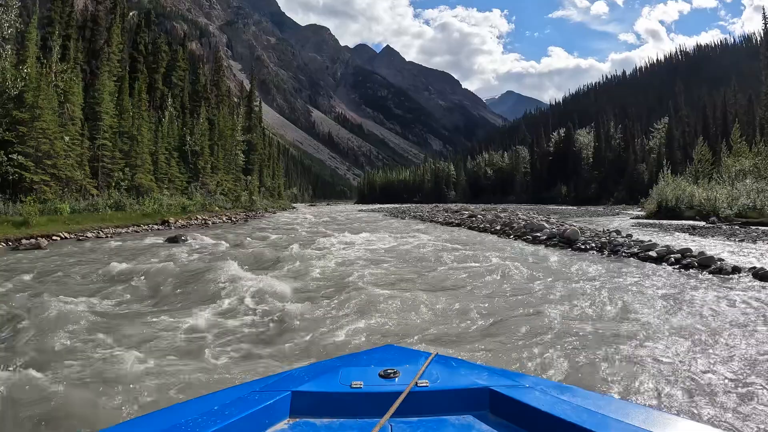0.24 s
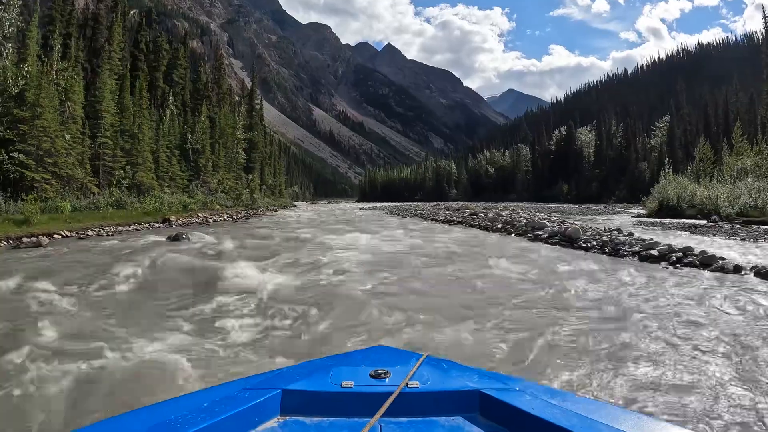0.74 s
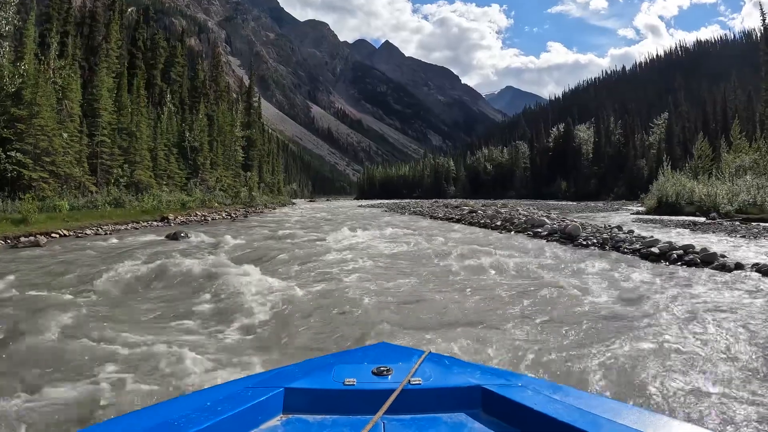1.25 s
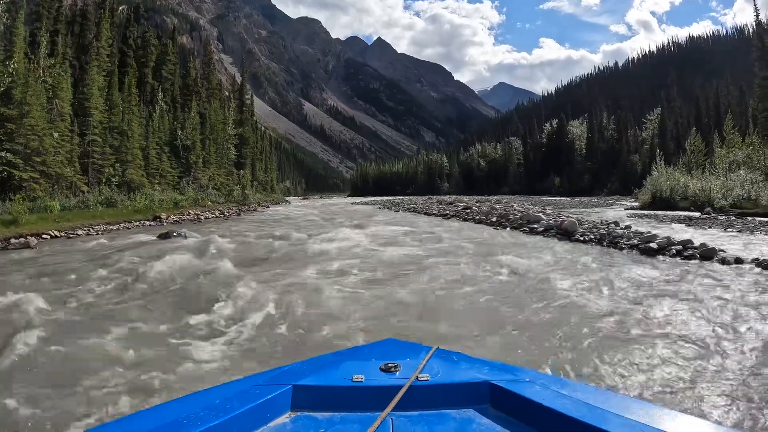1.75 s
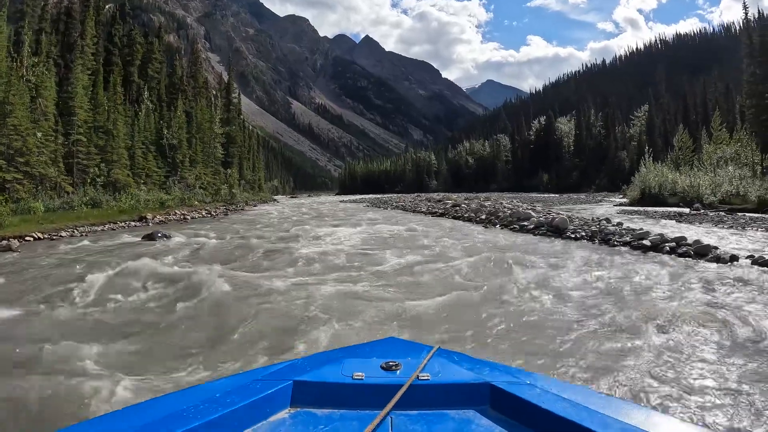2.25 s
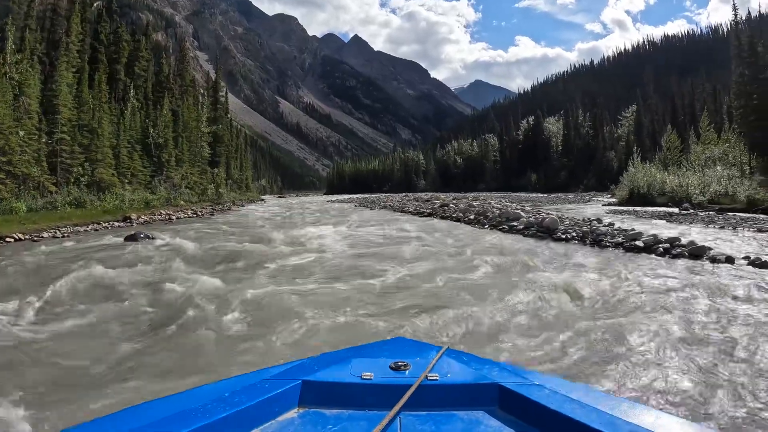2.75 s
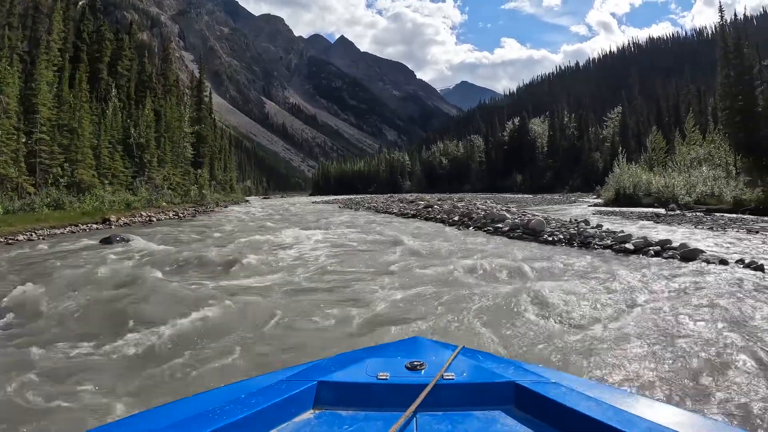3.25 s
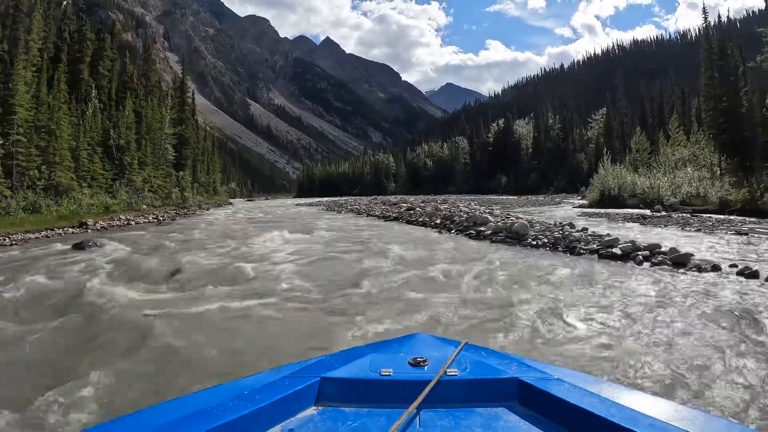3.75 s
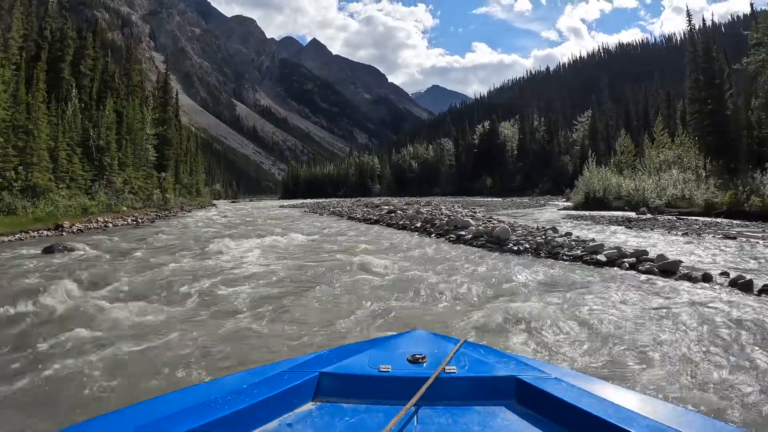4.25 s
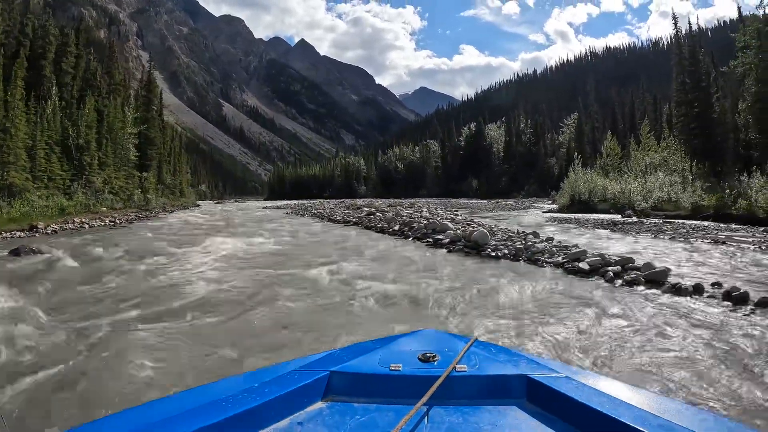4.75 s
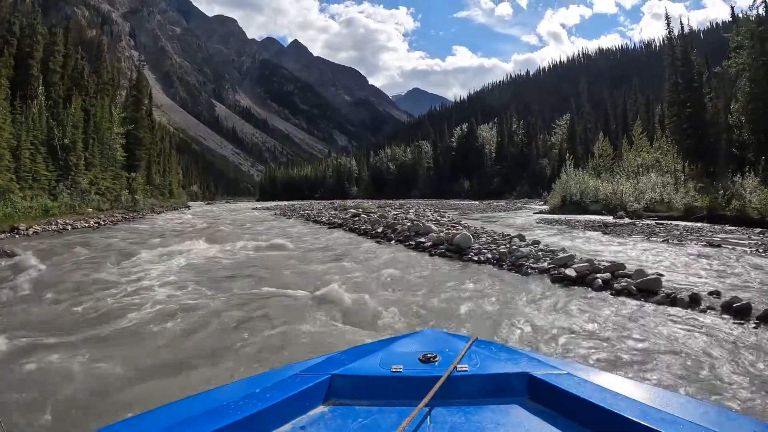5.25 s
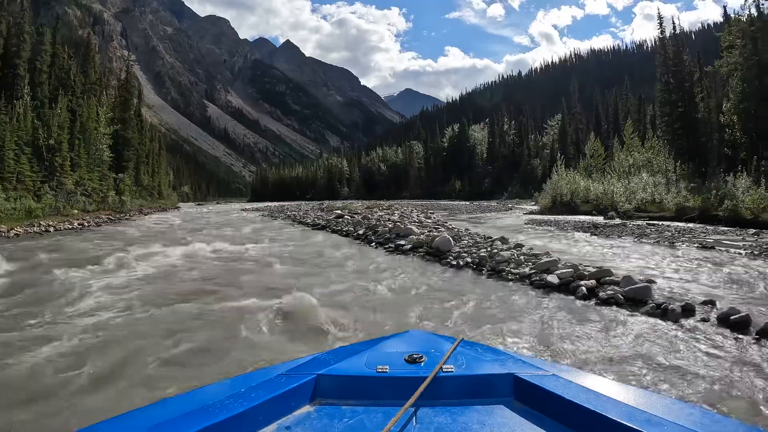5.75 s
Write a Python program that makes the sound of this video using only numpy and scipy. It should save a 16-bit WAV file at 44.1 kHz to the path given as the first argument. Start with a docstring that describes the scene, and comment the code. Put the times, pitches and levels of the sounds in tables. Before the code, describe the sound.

A boat's V8 revs up quickly, then holds a deep, unsteady drone that turns throbbing and burbly while river water rushes along the hull.

```python
"""A jet boat's V8 picks up speed and settles into a steady drone, heard from on board on a fast river.
The engine is a stack of unsteady tones at multiples of its cycle rate, and it buzzes the hull plates.
The exhaust at the waterline booms while clear; covered by the wake, it throbs and burbles with bubbles.
Water rumbles and slaps under the hull as shaped noise, and froth and fine drops fill its wash and spray.
A limiter holds the peaks."""
import sys
import numpy as np
from scipy import signal
from scipy.fft import rfft, irfft, next_fast_len
from scipy.io import wavfile
from scipy.ndimage import uniform_filter1d, minimum_filter1d, map_coordinates

SR = 44100
rng = np.random.default_rng(int(sys.argv[2]) if len(sys.argv) > 2 else 0)


def output_pcm(signal):
    """Save a mono or channel-first signal as 16-bit PCM at the path in sys.argv[1].

    Samples are clipped to [-1, 1] before scaling.
    """
    pcm = np.clip(np.atleast_2d(signal).T, -1, 1) * 32767
    wavfile.write(sys.argv[1], SR, np.round(pcm).astype(np.int16))


N = 264159
TOP_HZ = 15700  # band limit, also the highest starting pitch of a bubble
LOAD_DB_PER_DECADE = 60  # growl and plate buzz against engine speed

# Engine speed. Each row: time in seconds, four-stroke cycles per second.
ENGINE_SPEED = [(0, 15.67), (0.42, 17.92), (0.68, 18.15), (0.86, 18.02), (1.42, 19.32), (1.75, 19.63),
                (2.1, 19.67), (2.7, 19.92), (2.95, 20.14), (3.5, 20.34), (3.75, 20.17), (4.22, 20.25),
                (4.55, 19.92), (5.1, 19.66), (5.99, 19.54)]
# How far the wake covers the exhaust outlet. Each row: time in seconds, cover from 0 clear to 1 covered.
OUTLET_COVER = [(0, 0.088), (.6, .02), (1.2, 0.085), (1.5, 0.12), (1.62, 0.85), (1.82, 0.87), (1.96, .45),
                (2.25, 0.6), (2.65, .95), (3.45, 0.67), (3.95, 0.78), (4.55, .92), (4.98, 1), (5.2, 0.54),
                (5.98, 0.24)]

# Exhaust and engine levels that follow the cover, before any momentary change.
# Each is a pair: level with the outlet clear in dB, level with it covered in dB.
CRANK_DB = (-43.5, -20.5)  # crankshaft throb, two a cycle
LOPE_DB = (-31.5, -44.5)  # slow lope, three beats a cycle
TWICE_CRANK_DB = (-33.5, -24)  # four a cycle
FIRING_DB = (-15.5, -33.5)  # firing tone, eight a cycle
GROWL_GAIN_DB = (-2.5, .5)  # gain on all the weaker tones
RUMBLE_DB = (-34, -30)
BURBLE_DB = (-33.5, -26.5)

# Uneven beat of one cylinder bank, five a cycle, before swells. Each row: time in seconds, level in dB.
BANK_BEAT = [(0, -24.5), (.48, -13.5), (.8, -16.5), (1.2, -16), (2.0, -19), (3.15, -14.5), (4.25, -19),
             (5.2, -16.5), (5.98, -22)]
# Drone an octave above the firing tone, before swells. Each row: time in seconds, level in dB.
DRONE_LEVEL = [(0, -29.5), (.35, -29.5), (1.1, -34), (1.8, -29.8), (2.2, -31.5), (3.0, -29), (3.9, -32),
               (4.45, -27.5), (5.98, -27.5)]
# Weaker tones from unequal cylinders. Each row: multiple of the cycle rate, level in dB before load and cover.
GROWL_TONES = [(1, -43), (6, -40.5), (7, -30.5), (9, -40), (10, -37.5), (11, -41.5), (12, -43), (13, -44),
               (15, -42.5), (17, -41.5), (18, -47), (19, -47), (21, -52.5), (23, -50.5), (24, -49),
               (27, -56.5), (29, -52.5), (32, -53), (40, -56.5)]
# Engine tones that swell or fade for a moment.
# Each row: multiple of the cycle rate, middle in seconds, half length in seconds, change in dB.
TONE_SWELLS = [(3, 5.1, 0.35, 13.5), (5, 1.438, .1, -20), (5, 2.5, .22, -6), (5, 4.58, 0.078, -21.5),
               (5, 5.0, .07, -6), (8, 1.78, .09, -10), (8, 3.9, 0.045, 2.5), (16, 1.42, .06, -5),
               (16, 5.22, 0.084, -12.5), (19, 2.85, 0.24, 10), (21, .7, 0.45, 10.5), (21, 4.3, .3, 9.5)]
# Hull plate resonances. Each row: centre in Hz, width in Hz, relative gain in dB.
HULL_RESONANCES = [(273.6, 24, 2.5), (378.2, 23, -2.5), (635, 70, -15.5)]

# Waves that rumble under the hull. Each row: middle in seconds, half length in seconds, level in dB.
HULL_WAVES = [(.02, .1, -21), (1.618, .13, -24), (2.566, .08, -28), (3.677, 0.11, -22.5), (4.202, .08, -26),
              (5.6, 0.19, -23)]
# Exhaust gas gulping out of the wake. Each row: middle in seconds, half length in seconds, level in dB.
GAS_GULPS = [(1.7, 0.28, -22.5), (2.268, .11, -21), (4.15, .12, -25), (4.68, 0.14, -22.5), (5.17, .12, -26)]
# Water along the hull, before its flutter. Each row: time in seconds, wash level in dB, spray level in dB.
WATER_FLOW = [(0, -33.5, -50.5), (.3, -33.5, -51), (.62, -38.5, -55.5), (1.3, -37.5, -55),
              (2.2, -34.5, -54), (2.8, -31.5, -52), (3.7, -34.5, -54), (4.3, -32, -51), (4.8, -31.5, -51.5),
              (5.45, -33, -51), (5.99, -33.5, -52.5)]
# Slaps of water on the hull.
# Each row: start in seconds, level in dB before the envelope, pitch in Hz, length in seconds.
HULL_SLAPS = [(0.207, -31, 682, 0.03), (1.916, -33, 640, .16), (3.847, -31, 860, .02),
              (5.483, -45, 4250, .02)]

# Tone colours, as filter curves. Each row: frequency in Hz, relative gain in dB.
RUMBLE_COLOUR = [(5, -15), (14, -8.5), (32, -7), (50, 4.5), (72, 0.5), (105, -4.5), (150, -24), (300, -60),
                 (600, -120)]
BURBLE_COLOUR = [(40, -40.5), (80, -8), (120, -4), (165, -1), (205, -2), (240, -10.5), (330, -19),
                 (600, -44), (1500, -120)]
WASH_COLOUR = [(60, -29.5), (200, 3.5), (420, 2), (520, -1), (690, -1.5), (990, -5.5), (1500, -10.5),
               (2000, -17.5), (3000, -27.5), (6000, -56.5), (12000, -120)]
SPRAY_COLOUR = [(500, -51), (1400, -5.5), (2200, 0), (3100, -2.5), (4000, -6.5), (5000, -10.5),
                (6000, -14.5), (6900, -16.5), (8000, -18), (10000, -27), (11200, -30), (12300, -16.5),
                (13400, -31), (15500, -33)]


def amp(db):
    """Decibels to gain."""
    return 10 ** (np.asarray(db) / 20)


def unit(x):
    """Scale x to rms 1."""
    return x / np.sqrt(np.mean(x ** 2) + 1e-20)


def curves(rows):
    """Draw one automation curve, a value per sample, for each column after the time."""
    seconds, *columns = np.transpose(rows)
    return [np.interp(np.arange(N) / SR, seconds, column) for column in columns]


def blend(levels_db, cover):
    """Crossfade the gain from the clear to the covered level of the exhaust."""
    clear, covered = amp(levels_db)
    return clear + (covered - clear) * cover


def swell(middle, half_length):
    """A bell-shaped rise and fall around a moment, in seconds."""
    return np.exp(-((np.arange(N) / SR - middle) / half_length) ** 2)


def wobble(rate):
    """A smooth random curve with rate knots a second."""
    knots = rng.standard_normal(int(N * rate / SR) + 4)
    return map_coordinates(knots, [np.arange(N) * rate / SR])


def filtered(x, response):
    """Filter x by a complex response of frequency in Hz."""
    size = next_fast_len(N + SR // 2)
    hz = np.fft.rfftfreq(size, 1 / SR)
    return irfft(rfft(x, size) * response(hz), size)[:N]


def coloured(x, colour):
    """Shape x by a filter curve drawn on a log frequency axis, then scale to rms 1."""
    f, db = np.transpose(colour)
    return unit(filtered(x, lambda hz: amp(np.interp(np.log(hz + 1), np.log(f), db))))


def turbulence(patchy_db):
    """White noise with smooth patches of random gain in time and frequency."""
    grid = signal.stft(rng.standard_normal(N), nperseg=512)[2]
    patches = uniform_filter1d(rng.standard_normal(grid.shape), size=6, axis=0)  # across frequency
    patches = uniform_filter1d(patches, size=12, axis=1)  # across time
    return unit(signal.istft(grid * amp(patchy_db * unit(patches)), nperseg=512)[1][:N])


def bubbles(count, centre_hz, spread, cycles, size_db, rise):
    """Scattered damped rings of random pitch and size, each rising in pitch as it dies."""
    start, size = rng.random((count, 2)).T
    hz = centre_hz * np.exp(spread * rng.standard_normal((count, 1)))
    hz = np.clip(hz, centre_hz / 2, TOP_HZ)
    t = np.arange(int(2 * cycles * SR / centre_hz)) / SR
    age = hz * t / cycles  # 1 when the ring has died by 40 dB
    envelope = np.exp(-np.log(100) * age) * (1 - np.exp(-2 * hz * t))
    ring = np.sin(2 * np.pi * hz * t * (1 + rise * age / 2)) * envelope
    loudness = amp(-size_db * np.log(1 - size))[:, None]  # a few bubbles stand out
    at = (start[:, None] * N).astype(int) + np.arange(len(t))
    return unit(np.bincount(at.ravel(), (ring * loudness).ravel(), N)[:N])


def tone(angle, shake, shake_rate):
    """An engine tone of rms about 1; uneven combustion shakes its strength and phase."""
    unsteady = 1 + shake * (wobble(shake_rate) + 1j * wobble(shake_rate))
    carrier = np.exp(1j * (angle + 2 * np.pi * rng.random()))
    return np.sqrt(2 / (1 + 2 * shake ** 2)) * np.real(unsteady * carrier)


def engine(angle, load_db, cover):
    """Eight firings and two crank turns a cycle; water on the outlet muffles firing and passes crank throb."""
    def partial(order, shake, shake_rate):
        """The tone at one multiple of the cycle rate, with its momentary swells."""
        swell_db = sum(db * swell(s, half) for k, s, half, db in TONE_SWELLS if k == order)
        return amp(swell_db) * tone(order * angle, shake, shake_rate)

    beat_db, = curves(BANK_BEAT)
    drone_db, = curves(DRONE_LEVEL)
    crank = blend(CRANK_DB, cover) * partial(order=2, shake=0.37, shake_rate=7.7)
    lope = blend(LOPE_DB, cover) * partial(order=3, shake=0.2, shake_rate=7)
    twice_crank = blend(TWICE_CRANK_DB, cover) * partial(order=4, shake=0.067, shake_rate=6.4)
    beat = amp(beat_db) * partial(order=5, shake=0.1, shake_rate=20)
    firing = blend(FIRING_DB, cover) * partial(order=8, shake=0.089, shake_rate=24)
    drone = amp(drone_db) * partial(order=16, shake=0.17, shake_rate=28)
    growl = sum(amp(db) * partial(order=k, shake=0.3, shake_rate=5) for k, db in GROWL_TONES)
    growl = amp(load_db) * blend(GROWL_GAIN_DB, cover) * growl
    return crank + lope + twice_crank + beat + firing + drone + growl


def hull(angle, load_db):
    """The engine shakes the plates: overtones swell as they cross a resonance, over a rough buzz."""
    def plates(f):
        """Response of the resonances in parallel."""
        return sum(amp(db) * 1j * f * width / (centre * centre - f * f + 1j * f * width)
                   for centre, width, db in HULL_RESONANCES)

    def buzzing_plates(f):
        """The plates, falling away above 900 Hz and below 150 Hz."""
        return plates(f) / (1 + (f / 900) ** 4) * f ** 2 / (f ** 2 + 150 ** 2)

    shaking = sum(tone(k * angle, shake=0.3, shake_rate=6) for k in range(13, 34))
    bursts = rng.standard_normal(N) * (1 + 0.5 * np.cos(8 * angle))  # noise pulsing with the firing
    buzz = filtered(bursts, buzzing_plates)
    return amp(-35.5) * unit(filtered(shaking, plates)) + amp(load_db - 40.0) * unit(buzz)


def churn(cover):
    """Chop rumbles under the hull; exhaust gas breaks out of the wake as a dense stream of bubbles."""
    waves = sum(amp(db) * swell(s, half) for s, half, db in HULL_WAVES)
    gulps = sum(amp(db) * swell(s, half) for s, half, db in GAS_GULPS)
    gas = bubbles(count=2500, centre_hz=161.7, spread=0.3, cycles=5.5, size_db=1.0, rise=0.15)
    # Steady and momentary levels add as powers.
    rumble_gain = np.hypot(blend(RUMBLE_DB, cover), waves)
    burble_gain = np.hypot(blend(BURBLE_DB, cover), gulps)
    rumble = rumble_gain * coloured(rng.standard_normal(N), RUMBLE_COLOUR)
    return rumble + burble_gain * coloured(gas, BURBLE_COLOUR)


def water():
    """The bow wave rushes with small bubbles in it; its spray patters back as fine drops."""
    wash_db, spray_db = curves(WATER_FLOW)
    froth = bubbles(count=6000, centre_hz=898, spread=0.5, cycles=8, size_db=0.9, rise=0.23)
    wash = coloured(turbulence(patchy_db=1.0) + 0.1 * froth, WASH_COLOUR)
    drops = bubbles(count=12000, centre_hz=5500, spread=0.6, cycles=2.6, size_db=0.4, rise=0.1)
    spray = coloured(turbulence(patchy_db=0.5) + 0.3 * drops, SPRAY_COLOUR)
    flutter = amp(0.19 * wobble(13))
    return flutter * (amp(wash_db) * wash + amp(spray_db) * spray)


def slaps():
    """Single wavelets strike the hull: short bursts of narrow noise, quick to rise and slower to die."""
    out = np.zeros(N)
    for start, db, pitch_hz, length in HULL_SLAPS:
        age = np.maximum(np.arange(N) / SR - start, 0) / length
        noise = rng.standard_normal(N)
        band = unit(filtered(noise, lambda f: np.exp(-((f / pitch_hz - 1) / 0.17) ** 2)))
        out += amp(db) * band * (1 - np.exp(-20 * age)) * np.exp(-2 * age)
    return out


def scene():
    """Engine and water together; a faster engine works harder and growls more."""
    speed, = curves(ENGINE_SPEED)
    cover = np.clip(curves(OUTLET_COVER)[0], 0, 1)
    angle = 2 * np.pi * np.cumsum(speed) / SR  # phase of the four-stroke cycle
    load_db = LOAD_DB_PER_DECADE * np.log10(speed / speed.max()) + 0.8
    boat = engine(angle, load_db, cover) + hull(angle, load_db)
    return (boat + churn(cover) + water() + slaps())[None]


def limiter(x, ceiling_db, hold_s):
    """The gain dips smoothly around every peak above the ceiling."""
    needed = np.minimum(1, amp(ceiling_db) / (np.abs(x) + 1e-9))
    size = max(int(hold_s * SR), 2)
    return x * uniform_filter1d(minimum_filter1d(needed, size), size)


def record(dry):
    """Limit the peaks, fade both ends over 4 ms and cut everything from the band limit up."""
    t = np.arange(N) / SR
    to_nearest_end = np.minimum(t, t[-1] - t)
    fades = np.sin(np.pi / 2 * np.minimum(to_nearest_end / 0.004, 1)) ** 2
    limited = limiter(dry[0], ceiling_db=-6.3, hold_s=0.016)
    return filtered(fades * limited, lambda hz: hz < TOP_HZ)[None]


dry = scene()
out = record(dry)
output_pcm(out)
```